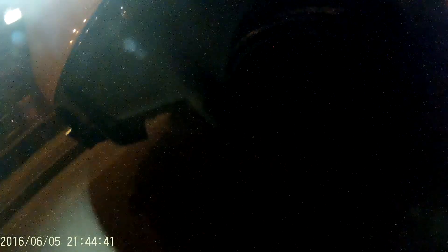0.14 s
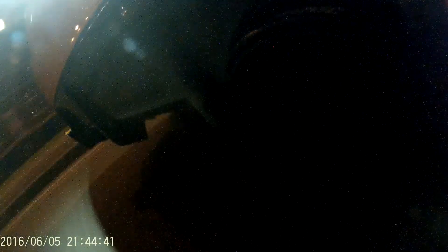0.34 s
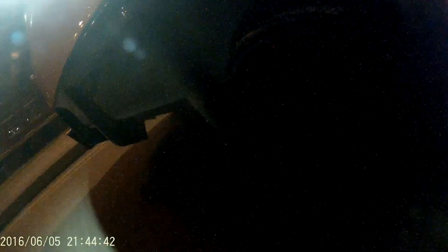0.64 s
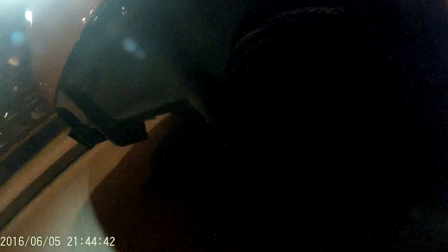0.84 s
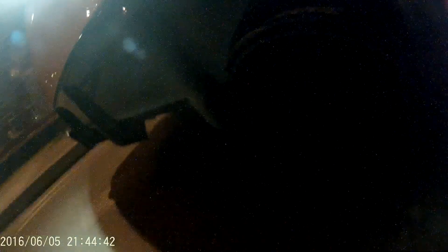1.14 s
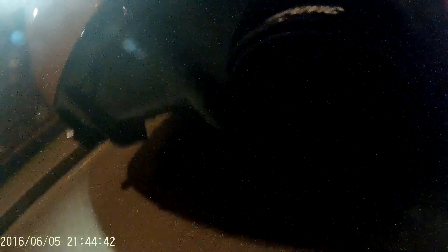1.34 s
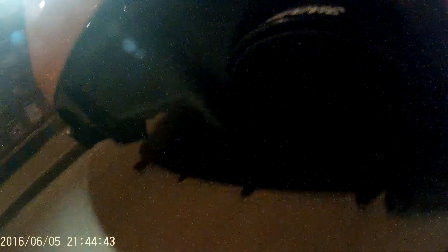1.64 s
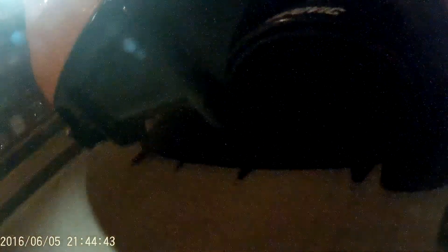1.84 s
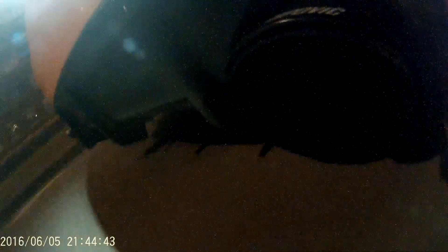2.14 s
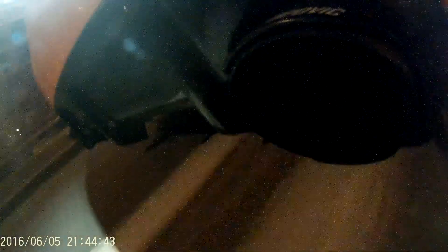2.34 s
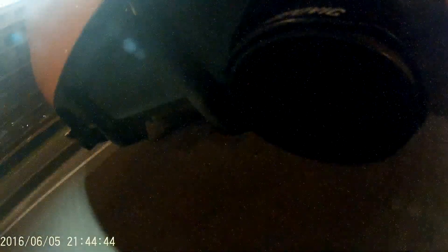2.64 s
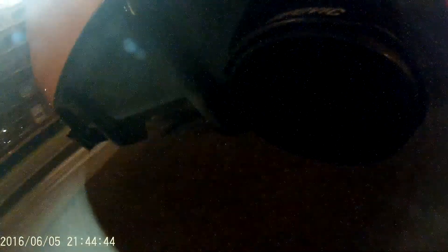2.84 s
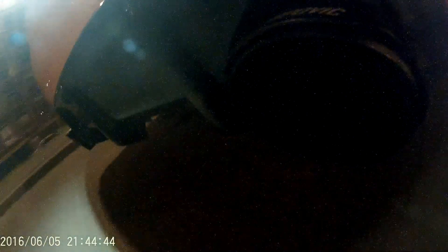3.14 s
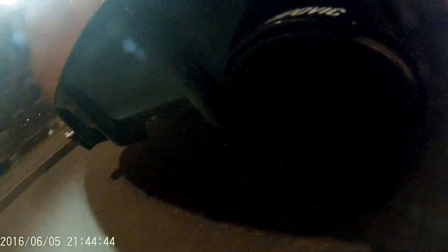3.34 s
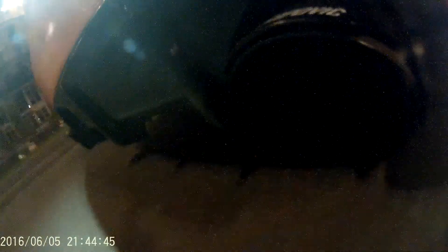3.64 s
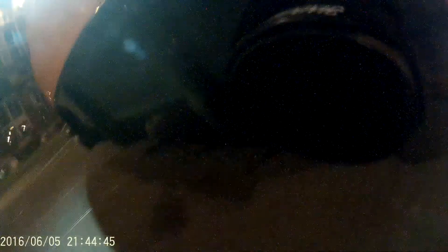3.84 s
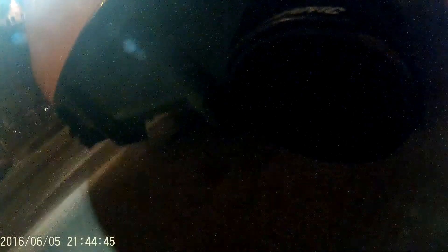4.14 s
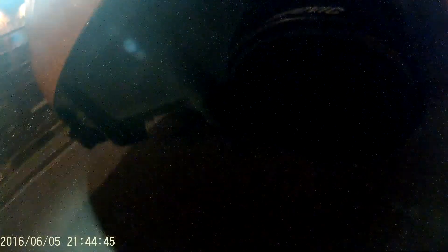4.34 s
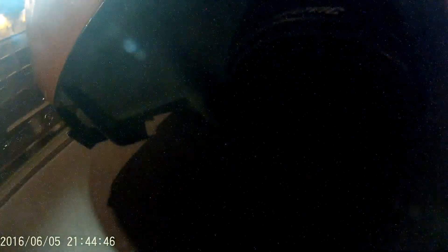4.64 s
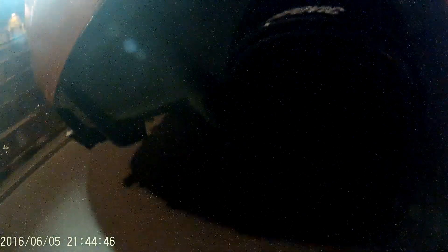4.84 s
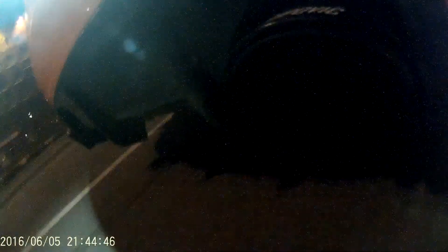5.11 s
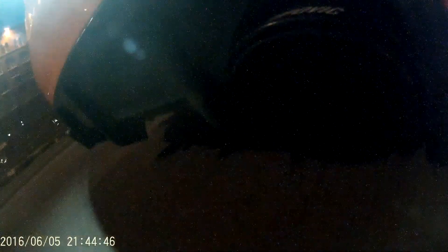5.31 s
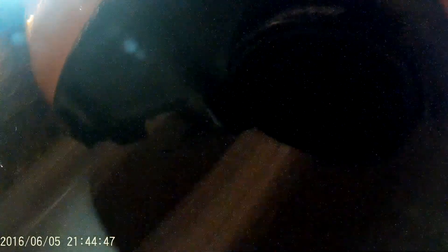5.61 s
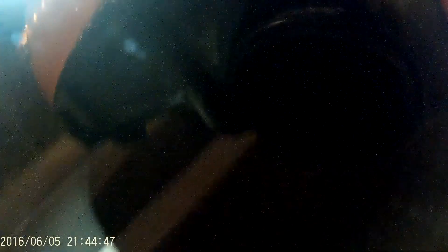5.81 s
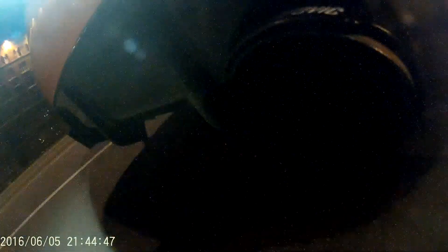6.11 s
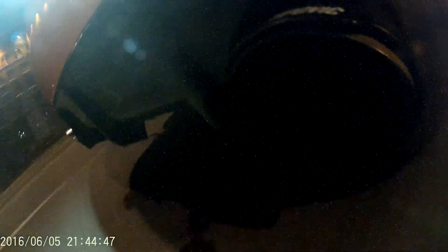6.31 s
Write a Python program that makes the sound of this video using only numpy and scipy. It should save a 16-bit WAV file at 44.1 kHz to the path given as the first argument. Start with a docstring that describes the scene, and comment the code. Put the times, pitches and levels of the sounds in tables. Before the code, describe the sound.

Warbling exhaust drone coasts lumpily, swells into a loud rasping turbo pull with sharp cracks, then cuts abruptly into a hollow boom, fading burble and small pops.

```python
"""Beside the tailpipe of a turbocharged five-cylinder car, where a small camera is fixed.
The car coasts, pulls hard as the turbo spools up, then runs down once the throttle snaps shut.
The silencer booms twice, as the revs sweep up and down through its tuning.
Five unequal firings a cycle ring the pipe, and noise stands for gas, tyres, gusts and surges.
Pops are short pulses with ringing noise; in the pull the camera's input overloads in sharp clicks."""
import sys
import numpy as np
from scipy import signal
from scipy.fft import rfft, irfft
from scipy.io import wavfile
from scipy.ndimage import uniform_filter1d

SR = 44100
rng = np.random.default_rng(int(sys.argv[2]) if len(sys.argv) > 2 else 0)


def generate_wav(sig):
    """Save sig (samples, or channels by samples) to the path in sys.argv[1] as 16-bit PCM at SR."""
    pcm = np.round(np.clip(np.atleast_2d(sig).T, -1, 1) * 32767).astype(np.int16)
    wavfile.write(sys.argv[1], SR, pcm)


N = 285327
TIME = np.arange(N) / SR  # seconds

# engine speed: start_s, firing_rate_hz
REVS = [(0.0, 130), (0.2, 126.6), (0.8, 122.9), (1.45, 117.4), (1.6, 125.2), (1.95, 129.5), (2.6, 161),
        (3.4, 197.1), (3.6, 204.9), (3.83, 216.5), (4.2, 192.2), (4.4, 177.3), (4.6, 164.9), (4.79, 127.5),
        (4.9, 136.5), (5.05, 131.8), (5.2, 131.9), (5.7, 126.9), (6.47, 108.8)]
# cylinders in firing order: strength_db, full_load_extra_db, low_revs_off_throttle_extra_db,
# lateness_in_firing_intervals (before the load scales it)
CYLINDERS = [(-0.5, 7, 4.5, 0), (5.5, -4.5, -5, .032), (4, -5.5, 1.5, -.069), (1.9, -1, -5.5, .009),
             (.2, 0.5, -2.5, 0.02)]
# pipe resonances before damping: pitch_hz, width_hz, lift_db
PIPE_RESONANCES = [(287, 120, 10), (446.6, 60, 21.5), (588.7, 35, 14), (730, 81, 11), (805, 63, 5),
                   (954, 160, 15.5)]
# resonances of the camera case: pitch_hz, width_hz, lift_db
CASE_RESONANCES = [(1269, 115, 7.5), (1605, 380, -7), (2048, 123, 6.5), (3100, 98, 5), (4360, 160, 5.5),
                   (5790, 170, 2.5), (7000, 140, 5)]

# the silencer's boom at each tone, cold and off the throttle: pitch_hz, level_db
SILENCER_BOOM = [(108, -42), (120, -38), (137, -32.5), (143, -24), (152, -17), (166, -17), (178, -26.5),
                 (190, -30), (220, -43)]
# the same for a tone an octave above the firing rate: pitch_hz, level_db
SILENCER_OCTAVE = [(220, -59), (250, -45), (270, -40.5), (290, -43), (330, -45.5), (370, -62.5),
                   (430, -63.5)]
# the engine falters and the boom drops out: middle_s, depth_db, half_length_s
FALTERS = [(0.056, 4, 0.16), (0.354, 20, 0.1), (1.466, 25, 0.057), (3.78, 10, 0.037), (6.35, 7, 0.14)]
# bark of the pipe off the throttle, loudest on the overrun: start_s, level_db
COASTING_BARK = [(0, -52), (.55, -41), (1.5, -42.5), (3.79, -31), (3.95, -27.5), (4.15, -30), (4.27, -37.5),
                 (4.7, -35.5), (4.85, -41), (6.47, -42.5)]
# throb of the unequal cylinders: multiple_of_engine_cycle_rate (a cycle is five firings)
THROB_ORDERS = [4, 6, 7, 8, 9, 12]
# strength of each throb: level_db (against the bark)
THROB_LEVELS = [-11, -15.5, -12.5, -16.5, -18.5, -13.5]

# tone of a soft firing: pitch_hz, level_db
SOFT_FIRING_TONE = [(100, -48), (230, 14.5), (340, -5.5), (600, 9.5), (850, 2), (1100, -11.5),
                    (1500, -27.5), (2100, -27.5), (3500, -63), (8000, -62.5)]
# tone of a hard firing: pitch_hz, level_db
HARD_FIRING_TONE = [(100, -41), (260, 1.5), (400, 5), (950, 8), (1350, -18), (2100, -24), (3500, -34),
                    (8000, -73)]
# tone of the rushing gas: pitch_hz, level_db
GAS_TONE = [(25, -30), (70, -12), (130, 2), (250, 3.5), (400, -3.5), (500, -1.5), (900, -2.5),
            (1300, -11.5), (1650, -14.5), (2100, -13.5), (2600, -26), (3600, -40), (4500, -52.5),
            (5200, -57), (15000, -84)]
# tone of the turbo's thin hiss: pitch_hz, level_db
HISS_TONE = [(1000, -29.5), (2000, 1.5), (2600, -15), (3100, -7.5), (3600, -25.5), (4200, -9.5),
             (5000, -42), (5800, -30.5), (6400, -41), (7000, -31.5), (8000, -50.5)]

# tone of tyres and slipstream: pitch_hz, level_db
ROAD_TONE = [(20, 6), (50, -8.5), (90, 0), (160, 6.5), (280, 0.5), (380, -4.5), (470, 3.5), (600, -15),
             (780, -7.5), (1050, -8), (1450, -13), (2100, -30.5), (2700, -47), (5000, -68)]
# loudness of the tyre and road roar: start_s, level_db
ROAD_LEVEL = [(0, -48), (1.3, -47), (1.9, -39.5), (6.47, -40.5)]
# tone of gas burbling in the silencer: pitch_hz, level_db
BURBLE_TONE = [(60, -23.5), (110, -8.5), (160, 3), (205, -12.5), (270, -0.5), (340, -20), (450, -14),
               (600, -22.5), (1500, -78.5)]
# tone of the exhaust surges: pitch_hz, level_db
SURGE_TONE = [(30, 2), (90, 7), (160, 4), (280, 2.5), (400, -1), (900, -3.5), (1150, -44), (2000, -70),
              (4000, -52)]
# gruff surges of the exhaust: middle_s, level_db, half_length_s
SURGES = [(.055, -38.5, .015), (.208, -35.5, 0.011), (.388, -27, 0.0093), (.535, -30, 0.013),
          (.59, -33, 0.015), (.681, -34.5, 0.019), (.721, -40, .012), (.798, -33.5, 0.015),
          (1.045, -33.5, 0.014), (1.422, -33.5, 0.0084), (1.495, -31, 0.0084), (1.725, -31.5, 0.0082),
          (5.505, -30, 0.016), (5.573, -31, 0.01)]

# fuel popping in the pipe, levels before the tone filters:
# start_s, thump_db, clack_db, crack_db, ring_s (time to fade by 60 dB)
POPS = [(1.6297, -31, -24, -20, 0.012), (1.632, -32, -14.5, -16.5, 0.012), (1.6833, -24, -30, -21, .01),
        (1.6861, -33, -22.5, -24, 0.015), (2.760, -25, -10, -5.5, 0.0095), (3.869, -16, -20, -25, 0.022),
        (5.4714, -13.5, -17, -43, .026), (5.493, -33, -22, -28, 0.013), (5.505, -23, -23, -13.5, 0.0073),
        (5.559, -31, -29, -33, .012), (5.586, -43, -29, -31, 0.0089), (5.5941, -23, -24, -19.5, 0.008),
        (5.625, -40, -34, -37, 0.013), (5.679, -21, -26, -33, 0.021)]
# tone of the clack in each pop: pitch_hz, level_db
CLACK_TONE = [(300, -14.5), (900, -11), (1400, 8.5), (1800, -2), (2200, -4.5), (2700, -14.5), (3400, -22),
              (4300, -41.5), (7500, -44)]
# ringing of the pipe wall in the clack: pitch_hz, width_hz, lift_db
WALL_RESONANCES = [(1760, 230, 14.2), (3400, 270, 5.1)]
# tone of the bright crack in each pop: pitch_hz, level_db
CRACK_TONE = [(1000, -10), (2800, -10.5), (4200, -15), (5200, -27), (7000, -41.5), (9000, -36),
              (15000, -48)]
# tone of gas buffeting the microphone: pitch_hz, level_db
BUFFET_TONE = [(20, 1), (70, 3), (120, -4.5), (350, -6), (700, -40.5), (3000, -75)]
# one low thud in the pull: middle_s, level_db, half_length_s
THUD = [(3.04, -29, 0.015)]
# clicks of the camera's input overloading in the pull: start_s, click_db (before the tone filter)
OVERLOADS = [(2.726, -23.5), (2.757, -29), (2.815, -17.5), (2.844, -15.5), (2.873, -21), (2.891, -26),
             (3.037, -28), (3.065, -26)]
# tone of the overload clicks: pitch_hz, level_db
OVERLOAD_TONE = [(500, -13), (4000, 5.5), (7000, -6.5), (15000, -10)]

# the throttle is held open once and let go abruptly
OPEN_S, OPENING_S, SHUT_S, SHUTTING_S = 1.59, 0.1, 3.745, 0.0043
# the turbo spools up in an S-curve and its pressure bleeds away after the lift
SPOOLED_S, SPOOL_TIME_S, BLEED_S, TRAPPED_SHARE = 2.147, 0.22, 0.05, 0.42
# engine load (0-1): on the bare throttle, and added by full boost
THROTTLE_LOAD, BOOST_LOAD = 0.5, 0.57
LEAD_S = 2.756  # the first cylinder is due to fire here
SMOOTH_HZ, LUMPY_HZ = 155, 125  # firing rates between which the coasting engine turns lumpy
# the pipe heats up a little after the boost, booms louder and is tuned higher by a share
HEATED_S, HEAT_TIME_S, BOOM_HEAT_DB, HEAT_SHIFT = 2.647, 0.15, 10, 0.061
OCTAVE_BOOST_DB = 19.5  # added by full boost
HARD_BARK_DB, BARK_PER_BOOM = -13.5, 0.7  # under throttle the bark follows the boom, in dB per dB
# levels with no boost, and what full boost adds
GAS_DB, GAS_BOOST_DB = -52, 34.5
HISS_DB, HISS_BOOST_DB = -66, 7.5
HISS_DB_PER_OCTAVE, HISS_FROM_HZ = 17, 137.5  # the hiss also grows with the firing rate
BURBLE_DB, BURBLE_LOAD_DB = -39.5, 4  # with no load, and added by full load
# gas buffets the microphone: at full boost, and after each pop (dB against its thump)
BUFFET_DB, POP_BUFFET_DB, POP_BUFFET_S = -39, -22.5, 0.063
TOP_HZ = 16000  # the treble is cut above this


def undb(db):
    """Turn decibels into a gain."""
    return 10 ** (np.asarray(db) / 20)


def unit(x):
    """Scale a sound to an average (rms) level of 1."""
    return x / np.sqrt(np.mean(x ** 2))


def even(x):
    """Hold the level at 1 over a few engine cycles, keeping the beat within them."""
    return x / np.sqrt(uniform_filter1d(x ** 2, size=4000) + 1e-9)


def curve(rows):
    """Join a table of times and values by straight lines."""
    times, values = np.transpose(rows)
    return np.interp(TIME, times, values)


def response(points, hz):
    """Read the level in dB that a tone table gives at each pitch."""
    table_hz, level_db = np.transpose(points)
    return np.interp(np.log(hz), np.log(table_hz), level_db)


def noise():
    """Make white noise with an rms level of 1."""
    return rng.standard_normal(N)


def walk(rate_hz):
    """Wander slowly by chance, with a new random point rate_hz times a second."""
    knots = rng.standard_normal(1024)
    return 1.2 * np.interp(TIME * rate_hz, np.arange(len(knots)), knots)


def swells(rows):
    """Make bell-shaped rises and falls of loudness from a table."""
    return sum(undb(db) * np.exp(-((TIME - middle) / length) ** 2) for middle, db, length in rows)


def colour(x, points=((100, 0), (1000, 0)), peaks=(), size=8192):
    """Filter a sound to a smooth tone with resonances on top, never sounding ahead of its cause."""
    hz = np.maximum(np.fft.rfftfreq(size, 1 / SR), 1)
    gain_db = response(points, hz)
    for centre, width, lift in peaks:
        gain_db = gain_db + lift / (1 + (2 * (hz - centre) / width) ** 2)
    # folding the cepstrum gives the quickest-starting filter with this tone
    cepstrum = irfft(np.log(undb(gain_db)))
    cepstrum[1:size // 2] *= 2
    cepstrum[size // 2 + 1:] = 0
    impulse = irfft(np.exp(rfft(cepstrum)))
    return signal.fftconvolve(x, impulse)[:N]


def clicks(times, sizes):
    """Place sharp impulses, each shared between two neighbouring samples."""
    position = np.clip(np.asarray(times) * SR, 0, N - 2)
    whole = position.astype(int)
    part = position - whole
    return np.bincount(whole, sizes * (1 - part), N) + np.bincount(whole + 1, sizes * part, N)


def damped(share):
    """Weaken the pipe's resonances, as flowing gas flattens them."""
    return [(hz, width, share * lift) for hz, width, lift in PIPE_RESONANCES]


def drive():
    """Work out throttle, turbo boost and engine load, each from 0 to 1."""
    held = np.clip((SHUT_S - TIME) / SHUTTING_S + 1, 0, 1)
    throttle = np.clip((TIME - OPEN_S) / OPENING_S, 0, 1) * held
    since_shut = np.maximum(TIME - SHUT_S - SHUTTING_S, 0)
    trapped = TRAPPED_SHARE * np.exp(-since_shut / BLEED_S)
    spool = 1 / (1 + np.exp((SPOOLED_S - TIME) / SPOOL_TIME_S))
    boost = (held + (1 - held) * trapped) * spool
    load = np.clip(throttle * (THROTTLE_LOAD + BOOST_LOAD * boost), 0, 1)
    return throttle, boost, load


def firings(turns, rate, load):
    """Make one pulse per firing; unequal cylinders add tones at every fifth of the firing rate."""
    count = np.arange(int(turns[0]), int(turns[-1]))
    chance = rng.standard_normal((len(count), 2))
    strength_db, extra_db, lumpy_db, late = np.array(CYLINDERS)[count % len(CYLINDERS)].T
    load_now = np.interp(count, turns, load)
    effort = load_now ** 2
    rate_now = np.interp(count, turns, rate)
    lumpy = np.interp(rate_now, [LUMPY_HZ, SMOOTH_HZ], [1, 0]) * (1 - load_now)
    # the cylinders are most evenly timed at about half load, less so at none or full
    uneven = 1 - 3.34 * load_now + 2.95 * effort
    jitter = (0.002 + 0.007 * load_now) * chance[:, 0]  # in firing intervals
    times = np.interp(count + late * uneven + jitter, turns, TIME)
    scatter_db = (0.5 + 1.3 * effort) * chance[:, 1]
    return clicks(times, undb(strength_db + extra_db * effort + lumpy_db * lumpy + scatter_db))


def silencer_boom(rate, angle, boost):
    """Boom as the revs sweep through the silencer's tuning; return the sound and its level in dB."""
    heat = boost / (1 + np.exp((HEATED_S - TIME) / HEAT_TIME_S))
    cold_rate = rate / (1 + HEAT_SHIFT * heat)  # a hot pipe responds like a cold one at lower revs
    falter_db = sum(depth * np.exp(-((TIME - s) / length) ** 2) for s, depth, length in FALTERS)
    boom_db = response(SILENCER_BOOM, cold_rate) + BOOM_HEAT_DB * heat - falter_db
    octave_db = response(SILENCER_OCTAVE, 2 * cold_rate) + OCTAVE_BOOST_DB * boost
    # the octave tone leans the pressure wave, which rises faster than it falls
    main = undb(boom_db + 1.7 * walk(18)) * np.cos(angle + 0.17)
    octave = undb(octave_db + 2.0 * walk(13)) * np.sin(2 * angle - 0.6)
    return np.sqrt(2) * (main - octave), boom_db


def pipe_bark(pulses, angle, throttle, load, boom_db):
    """Ring the pipe with each firing, harder under load, over the throb of unequal cylinders."""
    soft = unit(colour(pulses, SOFT_FIRING_TONE, PIPE_RESONANCES))
    hard = unit(colour(pulses, HARD_FIRING_TONE, damped(0.33)))
    bark = even((1 - load) * soft + load * hard)  # load steepens the pulses
    pulling_db = HARD_BARK_DB + BARK_PER_BOOM * boom_db
    bark_db = (1 - throttle) * curve(COASTING_BARK) + throttle * pulling_db
    cycle_angle = angle / len(CYLINDERS)
    throb = sum(undb(db) * np.sin(order * cycle_angle)
                for order, db in zip(THROB_ORDERS, THROB_LEVELS))
    return (bark + np.sqrt(2) * throb) * undb(bark_db)


def gas_and_hiss(pulses, rate, throttle, boost):
    """Let noisy gas out in spurts, each as strong as its firing, with the turbo's thin hiss."""
    spurt_fade = np.exp(-1 / (0.0027 * SR))  # each spurt dies away over 2.7 ms
    spurts = 2.4 + unit(signal.lfilter([1], [1, -spurt_fade], pulses))  # on a steady flow
    gas = even(unit(colour(noise() * spurts, GAS_TONE, damped(0.22))))
    hiss = unit(colour(noise() * spurts, HISS_TONE))
    gas_gain = undb(GAS_DB + GAS_BOOST_DB * boost)
    revs_db = HISS_DB_PER_OCTAVE * np.log2(rate / HISS_FROM_HZ)
    hiss_gain = np.maximum(throttle, boost) * undb(HISS_DB + HISS_BOOST_DB * boost + revs_db)
    return gas * gas_gain + hiss * hiss_gain


def engine(throttle, boost, load):
    """Drive the boom, the bark and the rushing gas from one train of firings."""
    rate = curve(REVS)
    turns = np.cumsum(rate) / SR  # counted in firings
    turns = turns - np.interp(LEAD_S, TIME, turns)
    angle = 2 * np.pi * turns
    boom, boom_db = silencer_boom(rate, angle, boost)
    pulses = firings(turns, rate, load)
    bark = pipe_bark(pulses, angle, throttle, load, boom_db)
    return boom + bark + gas_and_hiss(pulses, rate, throttle, boost)


def road():
    """Roar of tyres and slipstream: coloured noise that flutters a little."""
    return unit(colour(noise(), ROAD_TONE)) * undb(curve(ROAD_LEVEL) + 1.3 * walk(25))


def surges(load):
    """Unsteady gas burbles in the silencer, with short gruff swells of turbulent flow."""
    burble_db = BURBLE_DB + BURBLE_LOAD_DB * load + 2 * walk(20)
    burble = unit(colour(noise(), BURBLE_TONE)) * undb(burble_db)
    gruff = unit(colour(noise(), SURGE_TONE, damped(0.37))) * swells(SURGES)
    return burble + gruff


def pops(thump_s=0.00124, ping_db=9, fizz=0.66):
    """Each pop is a round pressure pulse, a clack that rings the pipe wall and a bright crack."""
    thump, clack, crack = np.zeros((3, N))
    for start, thump_db, clack_db, crack_db, ring in POPS:
        age = np.maximum(TIME - start, 0)
        fade = (TIME >= start) * undb(-60 * age / ring)
        thump += undb(thump_db) * np.sin(np.pi * np.minimum(age / thump_s, 1)) ** 2
        ping = clicks([start + thump_s], undb([ping_db]))  # struck as the thump ends
        clack += undb(clack_db) * (fizz * fade * noise() - ping)
        crack += undb(crack_db) * fade * noise()
    return thump + colour(clack, CLACK_TONE, WALL_RESONANCES) + colour(crack, CRACK_TONE)


def buffets(boost):
    """Low rumble of gas washing over the microphone, with the boost, around each pop and in a thud."""
    rumble = unit(colour(noise(), BUFFET_TONE))
    puffs = [(start, thump_db + POP_BUFFET_DB, POP_BUFFET_S) for start, thump_db, *_ in POPS]
    return rumble * (undb(BUFFET_DB) * boost + swells(puffs) + swells(THUD))


def overload_clicks():
    """Clicks of the camera's input overloading in the pull: single impulses with a bright tone."""
    times, level_db = np.transpose(OVERLOADS)
    return colour(clicks(times, undb(level_db)), OVERLOAD_TONE)


def scene():
    """Add up the sounds beside the tailpipe and the clicks of the overloaded input."""
    throttle, boost, load = drive()
    exhaust = engine(throttle, boost, load)
    mix = exhaust + road() + surges(load) + pops() + buffets(boost) + overload_clicks()
    return mix[None]


def record(dry, hiss_db=-68.5, ceiling=0.92):
    """The camera case rings, the input hisses and rounds off the loudest peaks, and the top is cut."""
    wet = colour(dry[0], peaks=CASE_RESONANCES) + undb(hiss_db) * noise()
    wet = wet / (1 + (wet / ceiling) ** 8) ** (1 / 8)
    treble_cut = signal.ellip(8, 0.2, 70, TOP_HZ, fs=SR, output="sos")
    return signal.sosfilt(treble_cut, wet)[None]


dry = scene()
out = record(dry)
generate_wav(out)
```